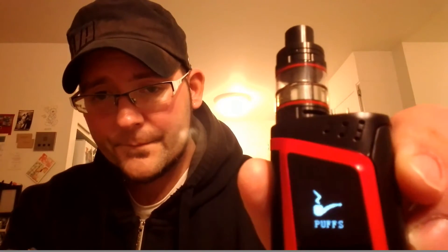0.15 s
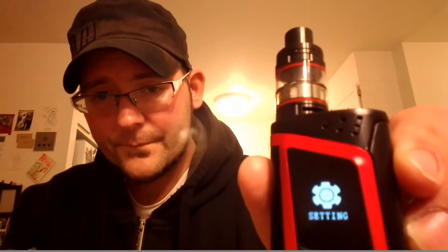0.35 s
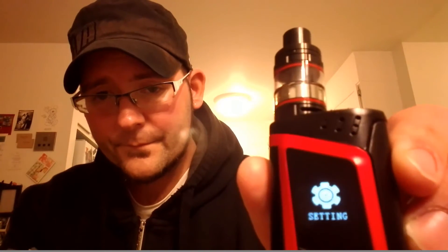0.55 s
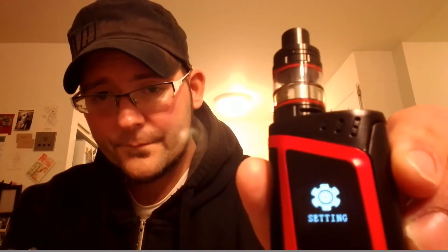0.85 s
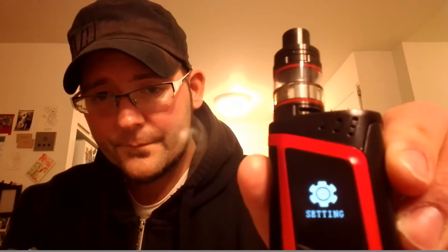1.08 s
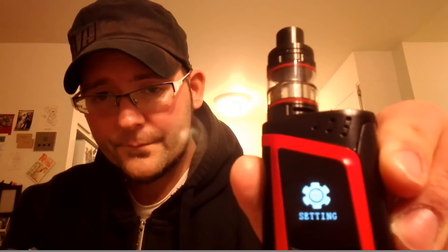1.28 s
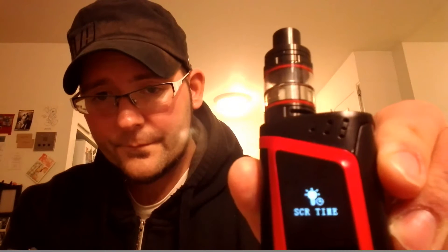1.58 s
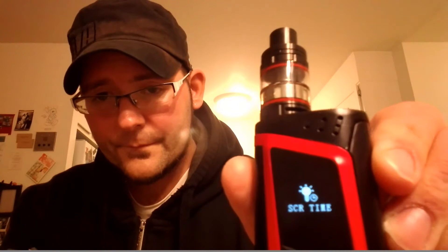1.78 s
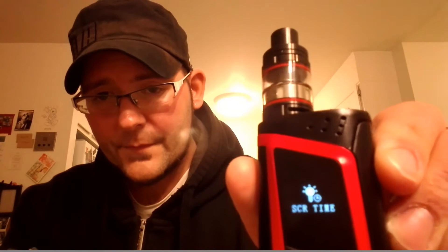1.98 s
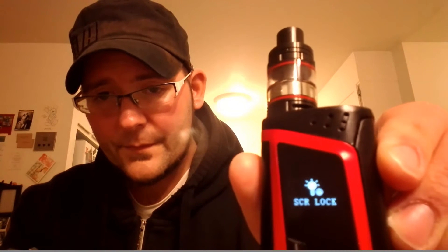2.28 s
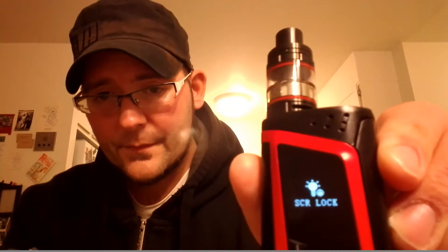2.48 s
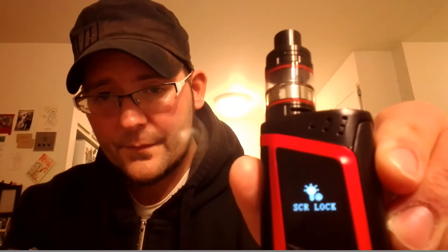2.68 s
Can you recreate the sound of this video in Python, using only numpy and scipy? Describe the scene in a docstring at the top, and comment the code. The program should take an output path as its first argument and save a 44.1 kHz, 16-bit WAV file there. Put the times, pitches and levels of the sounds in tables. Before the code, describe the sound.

A thumb presses a small button on a handheld electronic device: seven short, bright clicks, unevenly spaced, some in press-and-release pairs, close to a dull webcam microphone in a quiet room with faint hiss and low fan hum.

```python
"""Seven clicks of a small side button over continuous fan hum and steady hiss in a quiet room.
A thumb works the button of a handheld device close to a webcam microphone.
Each snap of the dome switch rings the shell as decaying sine modes; nearby surfaces return echoes and the
room a short noise tail. The fan is tones within narrow noise bands, the hiss is coloured noise.
The narrow-band microphone rolls off the treble and leaves a faint mirror of it higher up."""
import sys
import numpy as np
from scipy import signal
from scipy.fft import rfft, irfft, next_fast_len
from scipy.io import wavfile
from scipy.ndimage import uniform_filter1d

SR = 44100
rng = np.random.default_rng(int(sys.argv[2]) if len(sys.argv) > 2 else 0)


def output_pcm(signal):
    """Save a mono or channel-first signal as 16-bit PCM at the path in sys.argv[1].

    Samples are clipped to [-1, 1] before scaling.
    """
    pcm = np.clip(np.atleast_2d(signal).T, -1, 1) * 32767
    wavfile.write(sys.argv[1], SR, np.round(pcm).astype(np.int16))


N = 125685  # samples in the scene

# Button clicks ahead of the microphone: [t/s, level/dB, then gain/dB of mode groups 1 to 7 by grip and angle]
BUTTON_CLICKS = [(0.1853, -28, 4, 0, -7, 2, 4.5, 1, 0.5), (0.3777, -23.5, 4, -0.5, -7.5, -6, 7.5, 3, -1.5),
                 (1.0055, -27, 1.5, 0.5, -1, 5.5, 2, 0.5, -3),
                 (1.8202, -22, -1.5, -1.5, -2, -8, 1.5, -0.5, 0),
                 (2.0539, -26.5, 0.5, -1.5, -3.5, 5.5, -0.5, -1, 0),
                 (2.259, -22.5, 0, 0.5, -1, -1.1, 5.5, 3, 0.5),
                 (2.6847, -26, 0.5, -5, -3, 2.5, -2, -1.5, -1.5)]
# Modes of the shell: [f/Hz, relative level/dB, T60/s]
SHELL_MODES = [(1159, -14.5, 0.016), (1390, -9.5, 0.0061), (1696, -20.5, 0.019), (2054, -2, 0.0099),
               (2135, -32, 0.12), (2538, 4.5, 0.0054), (2822, -6, 0.014), (3103, -8, 0.013),
               (3475, -9, 0.0061), (3900, -13, 0.01), (4350, -14, 0.01), (4990, -20.5, 0.016),
               (5200, -9.5, 0.0073), (5533, -11, 0.0099), (6300, -15, 0.0055), (6990, -10.5, 0.0052)]
# Group of each shell mode, group 0 being unaffected by grip: [group number]
MODE_GROUP = np.array([1, 1, 1, 2, 2, 0, 3, 3, 7, 4, 5, 5, 6, 6, 6, 0])
# First direction in which each shell mode moves: [sign]
MODE_SIGN = np.array([1, -1, 1, 1, 1, -1, -1, 1, 1, 1, -1, -1, 1, -1, 1, 1])
# Echoes from nearby surfaces: [delay t/s, level re click/dB before colouring]
SURFACE_ECHOES = [(.0075, -24.5), (.0108, -27), (0.014, -35)]
# Colour of those echoes: [f/Hz, gain/dB]
ECHO_RESPONSE = [(1500, -7), (2100, -6.5), (2700, -9), (4200, 0), (5000, 11), (6000, 1)]
# Spectral shape of the diffuse room tail: [f/Hz, relative level/dB]
TAIL_SHAPE = [(900, -15), (1900, -3.5), (2100, -3), (2300, -12), (4300, -16), (4950, -7), (5500, -17),
              (8000, -14)]
# Fan hum lines: [f/Hz, bandwidth/Hz, level/dB of the wavering part, level/dB of the steady tone]
FAN_LINES = [(59.3, 1.3, -88, -86.5), (116.3, 7.1, -83, -90.5), (170, 8, -81.5, -82.5), (233, 12, -72, -72),
             (304, 25, -76.5, -90.5), (347, 5.4, -77.5, -85), (472, 12, -72, -81),
             (701.6, 47, -72.5, -84.5), (1265, 6.2, -76.5, -87)]
# Spectral shape of the hiss ahead of the microphone: [f/Hz, relative level/dB]
HISS_SHAPE = [(20, -2.5), (40, -33), (85, -16), (170, -17.5), (260, -6), (400, -8.5), (560, -11.5),
              (750, -9.5), (950, -11), (1300, -10), (2200, -12.5), (3300, -11), (5000, -13.5), (9000, -17)]
# Microphone response: [f/Hz, gain/dB]
MIC_RESPONSE = [(20, 1), (5000, 1.5), (5500, -3), (6000, -6), (6500, -14.5), (7000, -24.5), (7500, -37),
                (8000, -52.5), (9000, -85)]
# Response applied to the mirrored treble: [f/Hz, gain/dB]
MIRROR_RESPONSE = [(8000, -7), (9000, -6), (9700, -14.5), (10400, -21), (11000, -29.5), (11700, -41.5),
                   (12300, -69), (13000, -61), (14500, -67)]

MODE_SCATTER_DB = 0.7  # chance spread of each mode's level from click to click
SWELL_CYCLES = 1.09  # each mode builds up over about a cycle, so the treble arrives first
SHELL_CUTOFF_HZ = 914  # the small shell radiates little below
TAIL_DB, TAIL_T60_S, TAIL_START_S = -20.5, 0.15, 0.0055  # level re click before fading, decay, build-up
HISS_DB, FLICKER_DB, FLICKER_RATE_HZ = -55, 0.2, 6.74
MIC_RATE_HZ, ELECTRONICS_DB, TOP_HZ = 16000, -100, 15500


def button():
    """Each dome-switch snap reaches the microphone directly, off nearby surfaces and as room tail."""
    out = np.zeros(N)
    for start, db, *groups_db in BUTTON_CLICKS:
        snap = undb(db) * shell_click(groups_db)
        out = place(out, start, snap)
        for delay, echo_db in SURFACE_ECHOES:
            echo = undb(echo_db) * colour(snap, ECHO_RESPONSE)
            out = place(out, start + delay, echo)
        out = place(out, start, room_tail(db))
    return out


def shell_click(groups_db):
    """A snap excites decaying shell modes; the total energy equals 3 ms of sound at rms 1."""
    t = np.arange(SR // 10) / SR
    hz, db, t60 = np.array(SHELL_MODES).T
    grip_db = np.append(0, groups_db)[MODE_GROUP]
    scatter_db = MODE_SCATTER_DB * rng.standard_normal(len(hz))
    gain = MODE_SIGN * undb(db + grip_db + scatter_db)

    hz, t60 = hz[:, None], t60[:, None]  # one row per mode
    decay = np.exp(-np.log(1000) * t / t60)
    swell = 1 - np.exp(-(hz * t / SWELL_CYCLES) ** 2)
    ring = gain @ (np.sin(2 * np.pi * hz * t) * decay * swell)

    highpass = signal.butter(4, SHELL_CUTOFF_HZ, "high", fs=SR, output="sos")
    ring = signal.sosfilt(highpass, ring)
    return ring / np.sqrt(np.sum(ring ** 2) / (0.003 * SR))


def room_tail(click_db):
    """Diffuse wall reflections: coloured noise that builds up quickly and dies away exponentially."""
    t = np.arange(SR // 4) / SR
    decay = np.exp(-np.log(1000) * t / TAIL_T60_S)
    build_up = 1 - np.exp(-(t / TAIL_START_S) ** 2)
    noise = colour(rng.standard_normal(len(t)), TAIL_SHAPE)
    return decay * build_up * level(noise, click_db + TAIL_DB)


def fan():
    """Fan hum lines: a steady tone inside a narrow resonance of noise, which wavers."""
    t = np.arange(N) / SR
    hum = np.zeros(N)
    for hz, width, waver_db, tone_db in FAN_LINES:
        b, a = signal.iirpeak(hz, hz / width, fs=SR)
        # The first half lets the resonance settle
        waver = signal.lfilter(b, a, rng.standard_normal(2 * N))[N:]
        tone = np.sin(2 * np.pi * (hz * t + rng.random()))
        hum += level(waver, waver_db) + level(tone, tone_db)
    return hum


def hiss():
    """Background hiss: coloured noise whose level flickers slightly."""
    noise = level(colour(rng.standard_normal(N), HISS_SHAPE), HISS_DB)
    return noise * undb(FLICKER_DB * walk(FLICKER_RATE_HZ))


def walk(rate):
    """Slow random curve of standard deviation 1: random steps at rate (Hz), smoothed twice."""
    step = int(SR / rate)
    curve = np.repeat(rng.standard_normal(N // step + 1), step)
    curve = uniform_filter1d(uniform_filter1d(curve, step), step)[:N]
    return curve / np.std(curve)


def undb(db):
    """Amplitude ratio for a level in dB."""
    return 10 ** (np.asarray(db) / 20)


def level(x, db):
    """Scale x to the given rms level in dB."""
    return x * undb(db) / np.sqrt(np.mean(x ** 2))


def colour(x, points):
    """Zero-phase filter by (f/Hz, gain/dB) points joined on a log-frequency axis."""
    size = next_fast_len(len(x) + SR // 10)
    hz, db = np.array(points, float).T
    f = np.arange(size // 2 + 1) * SR / size + 1  # 1 Hz up, to avoid log(0)
    gain = undb(np.interp(np.log(f), np.log(hz), db))
    return irfft(rfft(x, size) * gain, size)[:len(x)]


def place(out, t, sound):
    """A copy of out with the sound added from time t (s), cut at the scene's end."""
    start = int(t * SR)
    padded = np.zeros(N + len(sound))
    padded[start:start + len(sound)] = sound
    return out + padded[:N]


def scene():
    """The close button over the fan and hiss, on one channel."""
    return (button() + fan() + hiss())[None]


def record(dry):
    """Narrow-band microphone: raising its low sample rate mirrors the treble; then electronics hiss and top cut."""
    mic = colour(dry[0], MIC_RESPONSE)
    # Multiplying by the sample-rate tone folds f to MIC_RATE_HZ - f
    folded = 2 * mic * np.cos(2 * np.pi * MIC_RATE_HZ * np.arange(N) / SR)
    mirror = colour(folded, [(7900, -75.5)] + MIRROR_RESPONSE)
    electronics = undb(ELECTRONICS_DB) * rng.standard_normal(N)
    top_cut = signal.ellip(8, 0.2, 30, TOP_HZ, fs=SR, output="sos")
    return signal.sosfilt(top_cut, mic + mirror + electronics)[None]


dry = scene()
out = record(dry)
output_pcm(out)
```